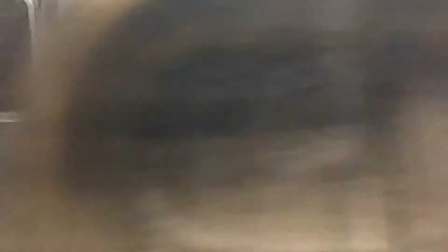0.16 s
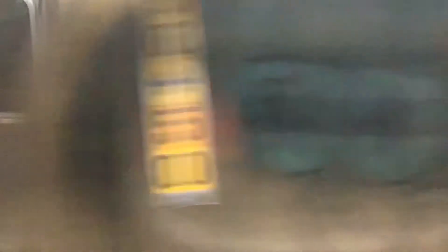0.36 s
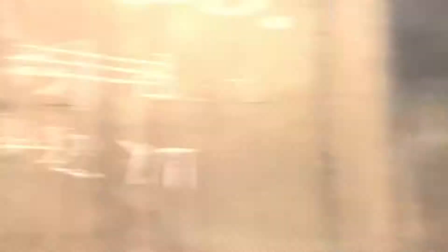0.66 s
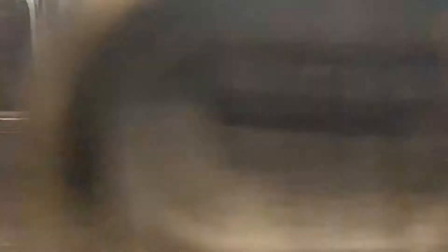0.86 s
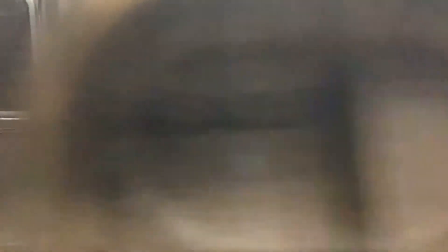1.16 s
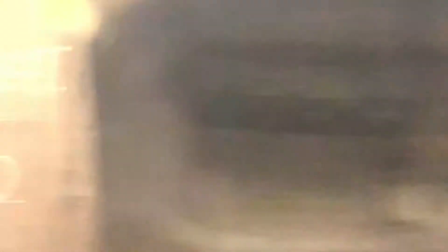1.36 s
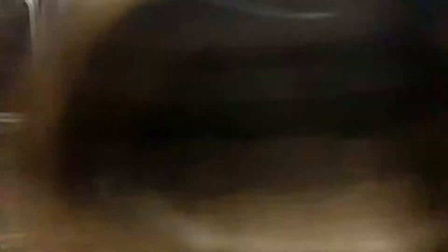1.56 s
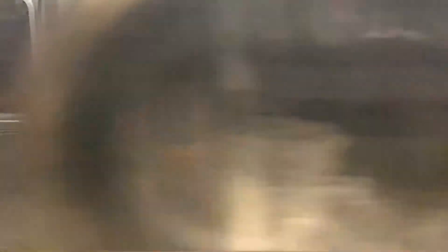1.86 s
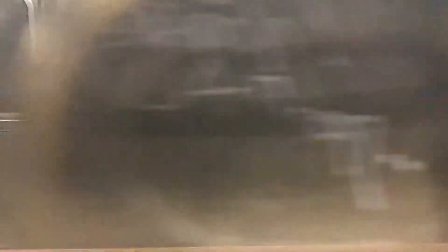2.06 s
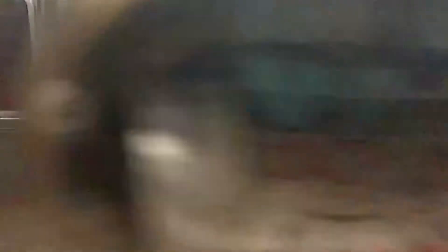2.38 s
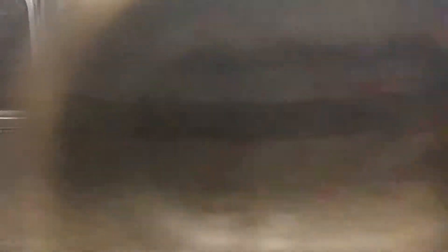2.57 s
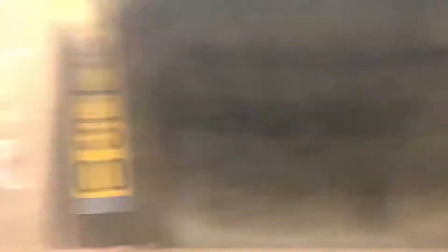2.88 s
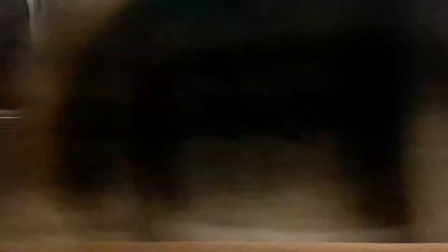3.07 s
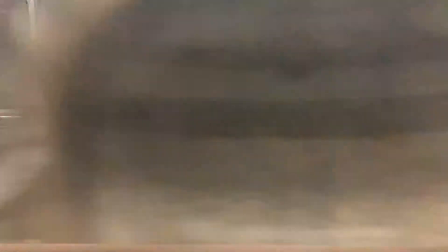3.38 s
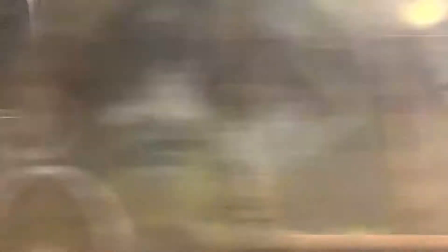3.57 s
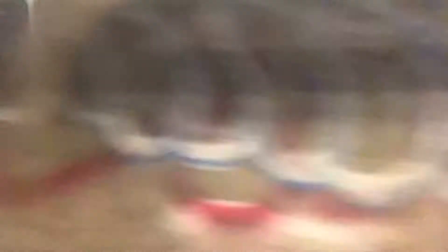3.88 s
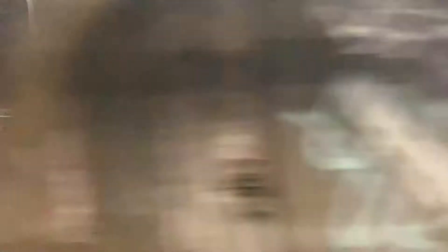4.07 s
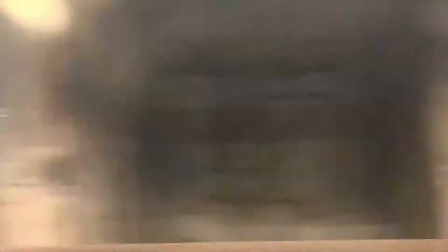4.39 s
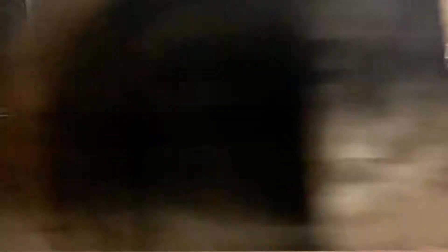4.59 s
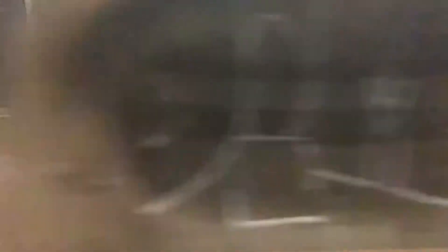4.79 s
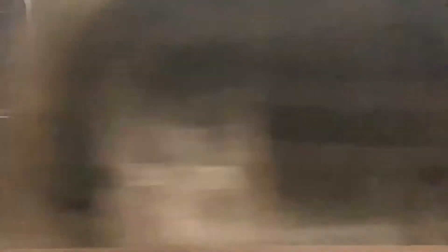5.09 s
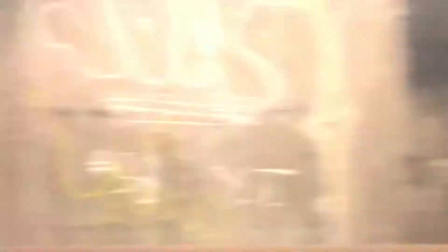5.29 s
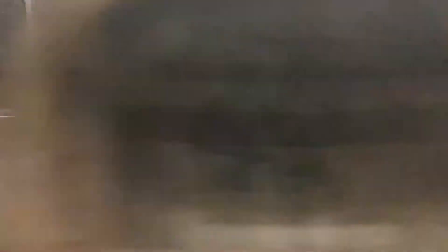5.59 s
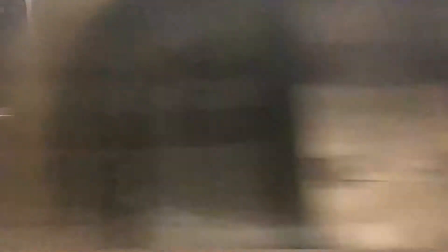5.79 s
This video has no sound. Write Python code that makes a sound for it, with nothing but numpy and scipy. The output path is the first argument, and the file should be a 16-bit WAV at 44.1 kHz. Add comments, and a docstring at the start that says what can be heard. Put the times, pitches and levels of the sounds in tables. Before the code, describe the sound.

Steady loud train rolling from within the car: broad low rumble, grainy midrange roar of wheels on rails, and loose humming thuds from floor and panels. It starts heaviest, eases gradually with a few jolts, and keeps running to the end. Thin, soft hiss and two tiny ticks sit far beneath. Handheld microphone near the window, enclosed tunnel sound, no voices.

```python
"""Wheels roll on rough rails: we are inside a subway car running at speed through a tunnel.
The rolling is shaped noise, a wide rumble below and a roar above, coloured by broad resonances.
The car body booms in three low modes: sine waves that hum loosely and firm up in each boom.
A surging hiss and two bright ticks come in from one side, both made of treble noise.
Single bands of the noise briefly sing out or sink."""
import sys
import numpy as np
from scipy import signal
from scipy.io import wavfile
from scipy.ndimage import uniform_filter1d

SR = 44100
rng = np.random.default_rng(int(sys.argv[2]) if len(sys.argv) > 2 else 0)


def store_wav(level_fs):
    """Save 16-bit WAV to argv[1]."""
    pcm = np.round(np.clip(np.atleast_2d(level_fs), -1, 1) * 32767)
    wavfile.write(sys.argv[1], SR, pcm.T.astype(np.int16))


N = 262262  # length in samples
SIZE, HOP = 1024, 256  # noise is built from short overlapping frames: length and step in samples


def gain_of(db):
    """Turn decibels into a factor for the amplitude."""
    return 10 ** (np.asarray(db) / 20)


def evened(x):
    """Scale a signal so that its average strength (rms) is 1."""
    return x / np.sqrt(np.mean(abs(x) ** 2) + 1e-20)


def read(points, hz):
    """Read the columns of a table at the frequencies hz, in straight lines over log frequency."""
    f, *columns = np.transpose(points)
    return [np.interp(np.log(hz + 1), np.log(f + 1), column) for column in columns]


def follow(rows, t):
    """Read the columns of a table at the times t, in straight lines between rows."""
    s, *columns = np.transpose(rows)
    return [np.interp(t, s, column) for column in columns]


def drift(span_s):
    """A random curve of rms 1; a longer span makes it wander more slowly."""
    width = max(int(span_s * SR), 2)
    smooth = uniform_filter1d(rng.standard_normal(N), width)
    return evened(uniform_filter1d(smooth, width))


def bump(t, peak_s, length_s, rise):
    """A smooth hump of height 1; rise is its rise time against its fall time."""
    side_s = np.where(t < peak_s, rise * length_s, length_s)
    return np.exp(-(2 * (t - peak_s) / side_s) ** 2)


def noise_pair(colour_db, same, lead, balance_db, patchy_db, slow_db, flicker_db, tilt_db=0):
    """Left and right noise of joint rms 1: random spectra, frame by frame, with patches, flicker and swells."""
    frames, hz = N // HOP + 5, np.fft.rfftfreq(SIZE, 1 / SR)
    a, b, c, d, quick, slow = rng.standard_normal((frames, len(hz), 6)).T

    # uneven loudness: small quick patches, longer-lasting ones in narrow bands,
    # and a flicker shared by all bands
    quick = uniform_filter1d(uniform_filter1d(quick, size=2, axis=0), size=5, axis=1)
    slow = uniform_filter1d(uniform_filter1d(slow, size=22, axis=1), size=14, axis=1)
    flicker = uniform_filter1d(rng.standard_normal(frames), size=3)
    field_db = patchy_db * evened(quick) + slow_db * evened(slow) + flicker_db * evened(flicker)
    field_db = field_db + swells_db(hz, np.arange(frames) * HOP / SR)

    # the right side shares part of the left side's noise and is shifted in phase
    same = np.clip(same, 0, 1)[:, None]
    left = a + 1j * b
    right = same * left + np.sqrt(1 - same ** 2) * (c + 1j * d)
    right = right * np.exp(1j * lead)[:, None]

    side = gain_of(balance_db / 2)[:, None]
    spectra = np.array([left * side, right / side]) * gain_of(colour_db[:, None] + field_db + tilt_db)
    return evened(signal.istft(spectra, nperseg=SIZE, noverlap=SIZE - HOP)[1][:, :N])


# how the rolling power spreads over pitch, before scaling: f/Hz, level/dB (per Hz)
ROLL_COLOUR = [(40, -45), (88, -46), (115, -42.5), (170, -44.5), (300, -44.5), (480, -47), (640, -53),
               (1100, -55), (1600, -58.5), (2650, -62), (2950, -65.5), (3150, -70), (4550, -73),
               (4800, -80), (5400, -84), (6500, -86.5), (7450, -89), (7800, -100), (9500, -130)]
# how left and right relate: f/Hz, likeness (0-1), phase/rad (right leads), left minus right level/dB
ROLL_SIDES = [(40, .9, -.2, -1), (220, .88, -.1, -1), (340, .63, -.5, 1.5), (460, .45, -1.1, 3),
              (520, .27, -1.6, 3.5), (700, .56, -1.9, 2), (1000, .3, -1.7, 3), (1400, .36, -2.5, 0),
              (1600, .4, -3.6, 0), (2200, .2, -5, 0), (2600, .28, -3.9, 0), (3200, .25, -3.3, 0),
              (3600, .1, -5.4, 0), (4000, .27, -6.3, 1), (4600, .1, -6.5, -2), (5800, .08, -6.3, -3),
              (6600, .5, -5.9, -1), (7400, .55, -4.8, 0)]
# course of the ride, before the jolts: t/s, rumble level/dB, roar level/dB,
# brightness of the roar/(dB per octave), shaking of the body level/dB
ROLL = [(0, -14, -24.5, 1, -17), (.2, -16, -21, 0, -14), (.4, -16.5, -22, -1, -16.5),
        (.8, -18.5, -24, -1, -18), (1.0, -17, -25, -0.4, -21), (1.2, -19, -23.5, 1, -18.5),
        (1.55, -16.5, -22, -1, -18.5), (1.9, -19.5, -25.5, 0.5, -17.5), (2.4, -19.5, -25.5, 0, -20.5),
        (2.75, -17.5, -24, -.5, -21), (3.1, -17.5, -24, -0.5, -15), (3.3, -18, -27, 1.5, -20),
        (3.8, -19.5, -26.5, 0.6, -22), (4.1, -21, -28, 1.5, -16), (4.3, -20.5, -28, 0.6, -20.5),
        (4.8, -19, -28, 0, -22), (5.2, -19.5, -28.5, 1.5, -24.5), (5.5, -20, -29, .5, -21.5),
        (5.95, -21.5, -28, 0, -21.5)]
JOLT_DULLS = 0.093  # dB per octave of brightness lost for each dB of roar gained in a jolt


def rolling():
    """Rough rails drive a rumble through the floor and, above it, a roar from the wheels."""
    hz, t = np.fft.rfftfreq(SIZE, 1 / SR), np.arange(N) / SR
    frame_s = np.arange(N // HOP + 5) * HOP / SR
    colour_db, sides = read(ROLL_COLOUR, hz)[0], read(ROLL_SIDES, hz)

    wheels = 1 / (1 + (680 / (hz + 1)) ** 4)  # the wheels' share of the power: half near 680 Hz
    rumble_colour_db = colour_db + 10 * np.log10(1 - wheels + 1e-9)
    roar_colour_db = colour_db + 10 * np.log10(wheels + 1e-9)

    brightness = follow(ROLL, frame_s)[2] - JOLT_DULLS * jolts_db(frame_s)[0]
    tilt_db = np.outer(np.log2((hz + 1) / 1500), brightness)  # tips around 1500 Hz

    rumble = noise_pair(rumble_colour_db, *sides, patchy_db=0.5, slow_db=2.1, flicker_db=0.7)
    roar = noise_pair(roar_colour_db, *sides, patchy_db=1.9, slow_db=2.4, flicker_db=.6, tilt_db=tilt_db)

    rumble_db, roar_db, *_ = follow(ROLL, t)
    roar_up_db, rumble_up_db = jolts_db(t)
    mix = rumble * gain_of(rumble_db + rumble_up_db) + roar * gain_of(roar_db + roar_up_db)
    return ringing(mix)


# resonances of car, wheels and rails, at rest: f/Hz, width/Hz, level/dB (negative for a hollow)
RINGS = [(249, 18, 1.5), (468, 14.5, 2), (602, 12, 4.5), (746, 48, 6), (1895, 36, 3), (2400, 190, 1),
         (3330, 125, -3.5), (3870, 290, 0.5), (5960, 260, 2.5)]
RING_WANDER, RING_WAVER = 0.017, 0.44  # typical share by which pitch and strength stray
RING_SPAN_S = 0.053  # how slowly they stray


def ringing(x):
    """Car, wheels and rails lift or hollow out bands that wander in pitch and vary in strength."""
    hz, t, spectra = signal.stft(x, SR, nperseg=2048, noverlap=1536)
    at = np.minimum((t * SR).astype(int), N - 1)
    field_db = 0
    for rest_hz, width_hz, db in RINGS:
        strength_db = db * (1 + RING_WAVER * drift(RING_SPAN_S)[at])
        pitch_hz = rest_hz * (1 + RING_WANDER * drift(RING_SPAN_S)[at])
        field_db = field_db + strength_db / (1 + (2 * (hz[:, None] - pitch_hz) / width_hz) ** 2)
    return signal.istft(spectra * gain_of(field_db), SR, nperseg=2048, noverlap=1536)[1][:, :N]


BOOM_RISE = 0.89  # rise time against fall time
BOOM_STEADIES = .5  # how firmly a boom holds the pitch of its mode


def body_mode(booms, rest_db, grain_s, wander, span_s):
    """The track shakes one mode of the car: a broken hum gives way to a firmer tone in each boom."""
    t = np.arange(N) / SR
    boom_power = sum((gain_of(db) * bump(t, s, length, BOOM_RISE)) ** 2 for s, _, db, length in booms)
    level = np.sqrt(boom_power)
    rest = gain_of(follow(ROLL, t)[-1] + rest_db)

    loose = rest / (rest + BOOM_STEADIES * level)  # near 1 between booms, smaller within them
    pitch_hz = follow(booms, t)[0] * (1 + wander * loose * drift(span_s))
    angle = 2 * np.pi * (np.cumsum(pitch_hz) / SR + rng.random())

    broken = drift(grain_s) * np.sin(angle) + drift(grain_s) * np.cos(angle)
    hum = rest ** 2 / (rest + level) * broken
    tone = np.sqrt(2) * np.sin(angle) * level * gain_of(1.4 * drift(span_s))
    return (tone + hum) * gain_of([[-.6], [.6]])  # dB left and right


# sway, drumming floor and panel: resting f/Hz (only sorts the booms), hum level/dB against the shaking
# when no boom sounds, grain of the hum/s, largest typical pitch wander (0-1), wander span/s
BODY_MODES = [(54, -5, 0.016, 0.1, 0.022), (90, -6, 0.022, 0.06, 0.0311), (139, -11, 0.055, 0.05, 0.0383)]
# booms, each of one mode, before quick random wavering of level and a fixed left-right balance: # peak t/s,
# f/Hz, level/dB, length/s
BOOMS = [(0.04, 130.7, -19.5, 0.23), (0.067, 46.7, -20, 0.3), (0.121, 86.7, -14, 0.076),
         (0.202, 92, -11.5, 0.085), (0.345, 91.9, -15.5, 0.29), (.46, 43.84, -24, 0.23),
         (0.48, 88, -22.5, 0.12), (0.626, 137, -19.5, 0.14), (0.745, 56, -21.5, 0.15),
         (0.955, 56.8, -12, 0.033), (1.146, 85.6, -16.5, 0.2), (1.2, 56.6, -17, 0.18),
         (1.303, 135.4, -30.5, 0.29), (1.318, 90, -15, 0.11), (1.506, 85.8, -14.5, 0.045),
         (1.5, 51.9, -17.5, 0.16), (1.6, 54, -19, 0.12), (1.71, 60, -20, 0.11), (1.612, 89, -15.5, 0.096),
         (1.69, 141, -24, 0.32), (1.756, 90, -24.5, 0.42), (1.948, 55.97, -26.5, 0.33),
         (2.159, 92.1, -18.5, 0.066), (2.231, 90, -20, 0.049), (2.355, 94.1, -19, 0.1),
         (2.372, 58.2, -24, 0.3), (2.665, 49.8, -17, 0.079), (2.901, 51.64, -21, 0.17),
         (3.04, 55, -18.5, 0.1), (3.055, 91.7, -13, 0.05), (3.076, 138.9, -18, 0.13),
         (3.144, 90, -14, 0.097), (3.236, 51.55, -24, 0.23), (3.327, 90.5, -16, 0.028),
         (3.529, 50.7, -26, 0.2), (3.738, 50.4, -22, 0.1), (3.89, 58.34, -20, 0.11),
         (3.942, 85.8, -17.5, 0.083), (4.07, 53.9, -24, 0.11), (4.118, 89.8, -14, 0.11),
         (4.15, 138.8, -26.5, 0.31), (4.219, 55.8, -21.5, 0.096), (4.257, 89.6, -18, 0.25),
         (4.393, 145, -23, 0.056), (4.432, 54, -20.5, 0.11), (4.592, 90.6, -25, 0.048),
         (4.616, 135.1, -25.5, 0.16), (4.781, 50.7, -23.5, .12), (4.927, 49.94, -21, 0.14),
         (5.102, 92.6, -23.5, 0.07), (5.134, 57.35, -23, 0.14), (5.332, 88.5, -17.5, 0.053),
         (5.579, 59, -24, 0.1), (5.828, 56.2, -23.5, 0.3), (5.86, 92.6, -20.5, 0.056)]


def car_body():
    """Sway, floor and panel vibrate; each mode plays the booms nearest to its resting pitch."""
    booms = np.array(BOOMS)
    rest_hz = np.array(BODY_MODES)[:, 0]
    nearest = np.argmin(abs(np.log(booms[:, 1:2] / rest_hz)), axis=1)
    return sum(body_mode(booms[nearest == k], *mode[1:]) for k, mode in enumerate(BODY_MODES))


def hiss_sides(hz):
    """Treble from one side reaches the right first, so the phase gap grows with pitch."""
    lead_s, in_step_hz = .000222, 10950  # head start of the right; pitch where both sides agree
    return np.full(len(hz), .98), 2 * np.pi * (hz - in_step_hz) * lead_s, 0 * hz


# colour of the main hiss, before scaling: f/Hz, level/dB
HISS_COLOUR = [(4500, -22), (6000, -2), (6800, 6), (7500, 5), (7900, 3), (8420, 7), (9000, 4), (10000, 1),
               (11500, -4), (13000, -24)]
# colour of its top octave, before scaling: f/Hz, level/dB
TOP_COLOUR = [(10000, -24), (11500, 0), (13000, -2), (14500, -6), (15600, -11)]
# background hiss under the surges, fading and then returning: t/s, level/dB
HISS_FLOOR = [(0, -53), (1, -60), (4.5, -72), (5.95, -61.5)]
HISS_FLOOR_TOP_DB = -15  # top octave against the main hiss, outside the surges
# surges of the hiss: peak t/s, level/dB, length/s, top octave level/dB against the main hiss
SURGES = [(0.198, -50.5, 0.11, -11), (0.408, -55, .14, -7), (0.525, -56, 0.046, -10),
          (0.768, -65, 0.15, -4), (1.14, -59.5, 0.22, 2), (1.529, -61, 0.37, -11), (1.881, -59, .08, -13),
          (2.117, -49, 0.16, -15), (2.441, -53, 0.14, -25), (2.668, -61, 0.072, -25),
          (2.95, -57.5, 0.65, -7), (3.481, -61, 0.11, -9), (3.654, -60, 0.14, -21), (3.84, -54.5, 0.11, -3),
          (4.085, -53.5, 0.46, -15), (4.41, -54.5, 0.34, -9), (4.78, -53.5, 0.28, -11),
          (5.068, -65, 0.1, -14), (5.758, -67, 0.078, -11)]
SURGE_RISE = 0.48  # rise time against fall time


def hiss():
    """Treble noise surges over a background hiss, and its top octave comes and goes."""
    hz, t = np.fft.rfftfreq(SIZE, 1 / SR), np.arange(N) / SR
    sides = hiss_sides(hz)
    air = noise_pair(read(HISS_COLOUR, hz)[0], *sides, patchy_db=1.5, slow_db=.7, flicker_db=.9)
    top = noise_pair(read(TOP_COLOUR, hz)[0], *sides, patchy_db=2.1, slow_db=.9, flicker_db=1.5)
    out = gain_of(follow(HISS_FLOOR, t)[0]) * (air + gain_of(HISS_FLOOR_TOP_DB) * top)
    for s, db, length, top_db in SURGES:
        surge = gain_of(db) * bump(t, s, length, SURGE_RISE)
        out = out + surge * (air + gain_of(top_db) * top)
    return out


# bands that sing out or sink for a moment, before the noise is scaled to rms 1:
# middle t/s, length/s, f/Hz, width/Hz, level/dB against the noise
SWELLS = [(0.11, 0.37, 280, 120, 2.5), (0.245, 0.11, 5800, 340, 7), (0.955, 0.12, 270, 37, 9),
          (1.17, 0.57, 490, 52.3, 7), (0.21, 0.38, 3200, 700, 1), (1.24, 0.37, 2500, 1200, 3.5),
          (0.43, .1, 90, 25, 3), (2.1, .9, 2500, 90, 3), (0.054, .06, 1920, 200, 8.5),
          (0.38, 0.055, 1900, 298, 1), (0.895, .05, 1700, 120, 11), (1.1, 0.067, 1740, 260, 8.5),
          (1.43, 0.028, 1500, 201, -7), (1.54, 0.12, 2360, 400, 3.5), (2.8, .57, 2100, 140, 3.5),
          (2.31, 1.2, 440, 41, 4.5), (2.62, 0.45, 295, 150, 3.5), (2.957, 0.034, 443, 60, 14),
          (2.898, .06, 258, 60.3, 0), (3.1, 0.082, 218, 100, 2.5), (3.96, .5, 203, 30, 5.5),
          (5.74, 0.21, 258, 65, 6.5), (5.864, 0.083, 350, 80, 7.5), (5.544, 0.067, 237, 60, 6),
          (2.54, 0.14, 1860, 140, 6), (3.702, 0.22, 4700, 300, 7), (4.075, 0.14, 4400, 600, 3),
          (4.14, 0.15, 2300, 800, 1.5), (2.558, .4, 140, 80, 0.5), (3.2, 0.046, 150, 140, 5),
          (3.8, .25, 2400, 500, 3), (4.6, .6, 2200, 600, -2.5), (4.9, 1.9, 500, 130, -2),
          (0.93, .1, 220, 120, 1.5), (2.78, 0.66, 204, 76, 1), (3.5, 0.76, 1080, 200, 2.5),
          (4.55, .7, 136, 50, 3), (0.53, 0.63, 850, 150, 1.5), (4.085, 0.063, 1600, 1800, 3),
          (0.9, .25, 4900, 2500, -1), (5.6, .5, 4800, 2500, -1), (0.074, 0.27, 170, 80, 2),
          (3.5, .08, 2700, 200, 4), (4.062, 0.034, 220, 152, 5.5), (4.147, 0.18, 370, 119, 6.5),
          (4.533, 0.049, 390, 42, 11.5), (4.78, 0.2, 6540, 420, 9), (4.92, 0.64, 1860, 180, 4),
          (5.31, 0.1, 1846, 138, 12), (5.58, 0.25, 8400, 350, 11), (5.85, 0.42, 1860, 140.7, 6)]


def swells_db(hz, t):
    """Each swell lifts or lowers one band of noise for a moment: a gain over frequency and time."""
    field_db = 0
    for s, length, peak_hz, width_hz, db in SWELLS:
        band = 1 / (1 + (2 * (hz - peak_hz) / width_hz) ** 2)
        field_db = field_db + db * np.outer(band, bump(t, s, length, 1))
    return field_db


# rough spots in the rail jolt the wheels: peak t/s, roar gain level/dB, rumble gain level/dB, length/s
JOLTS = [(0.211, 2.5, -5, 0.1), (0.405, 3, -0.5, 0.052), (0.594, 0, 2.5, 0.22), (0.708, 1.5, -4, 0.091),
         (0.922, 2.5, -0.5, 0.092), (1.15, 1, 4, 0.13), (1.457, 1, 0.5, 0.18), (2.5, 1.5, 2, 0.15),
         (2.898, 2.5, 1, 0.12), (3.112, 0.5, 1.5, 0.1), (3.928, 2.5, 2.5, 0.06), (4.07, 3.5, 2, 0.25),
         (4.091, 2, 0.5, 0.032), (4.26, 0.5, 3, 0.11)]
JOLT_RISE = 0.4  # rise time against fall time


def jolts_db(t):
    """Rough spots jolt the wheels and briefly change the gain of roar and rumble."""
    return sum(np.outer([roar_db, rumble_db], bump(t, s, length, JOLT_RISE))
               for s, roar_db, rumble_db, length in JOLTS)


# short bright ticks: start t/s, peak level/dB of the noise gain
TICKS = [(0.523, -53.5), (3.833, -52)]
TICK_S = 0.026  # length of a tick


def ticks():
    """Each tick is a short burst of bright noise that swells and fades in one smooth arch."""
    hz, t = np.fft.rfftfreq(SIZE, 1 / SR), np.arange(N) / SR
    colour_db = read([(6000, -20), (9000, -4), (14000, -11)], hz)[0]  # f/Hz, level/dB
    bright = noise_pair(colour_db, *hiss_sides(hz), patchy_db=0, slow_db=0, flicker_db=3)
    arches = sum(gain_of(db) * np.sin(np.pi * np.clip((t - s) / TICK_S, 0, 1)) ** 2 for s, db in TICKS)
    return arches * bright


def scene():
    """Add up the rolling, the car body, the hiss and the ticks."""
    return rolling() + car_body() + hiss() + ticks()


LOW_CUT_HZ, EDGE_HZ = 38, 15760  # limits of the low and high end
CEILING = 1.1  # the preamplifier rounds off peaks towards this value


def record(dry):
    """The microphone cuts the lows, the preamplifier rounds off peaks, and a filter cuts the highs."""
    # mirrored ends, so that the filters are already running at the start
    lead_in = np.pad(dry, [(0, 0), (SIZE, SIZE)], "reflect")
    low_cut = signal.butter(5, LOW_CUT_HZ, "high", fs=SR, output="sos")
    thinned = signal.sosfilt(low_cut, lead_in)
    rounded = thinned / (1 + (thinned / CEILING) ** 6) ** (1 / 6)
    edge = signal.firwin(511, EDGE_HZ, window=("kaiser", 9), fs=SR)
    fade_in = np.minimum(np.arange(N) / (.004 * SR), 1)  # a soft start
    return signal.oaconvolve(rounded, edge[None], "same")[:, SIZE:-SIZE] * fade_in


dry = scene()
out = record(dry)
store_wav(out)
```